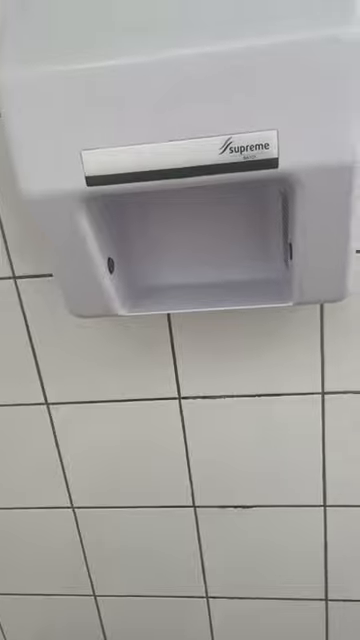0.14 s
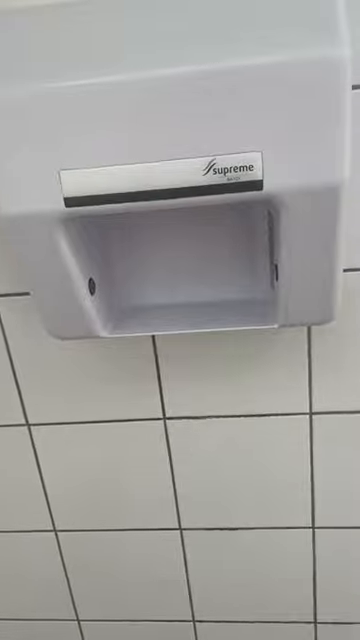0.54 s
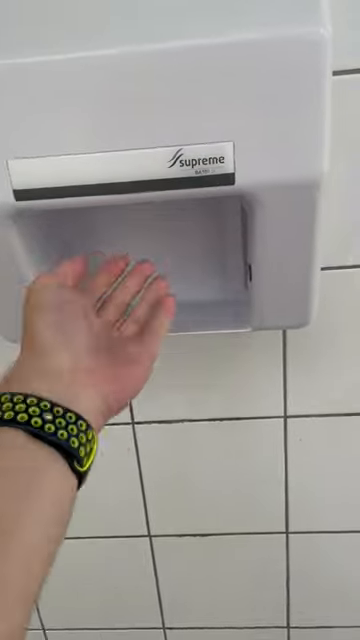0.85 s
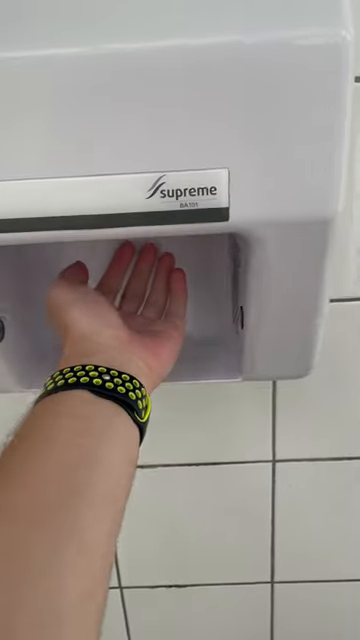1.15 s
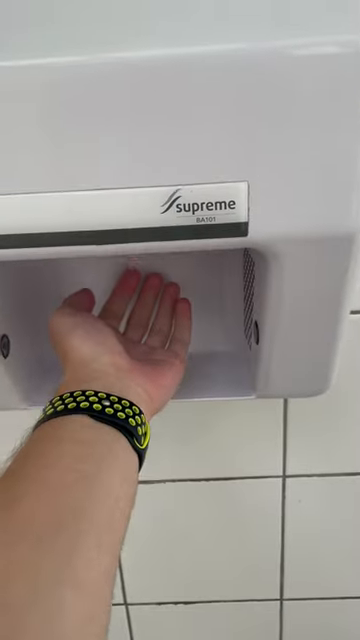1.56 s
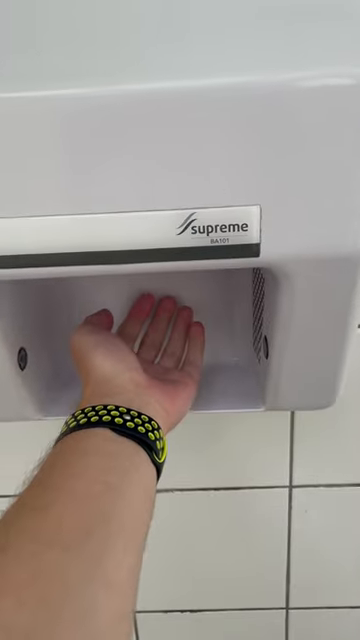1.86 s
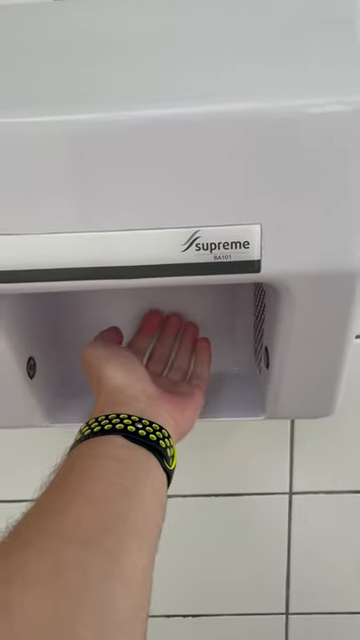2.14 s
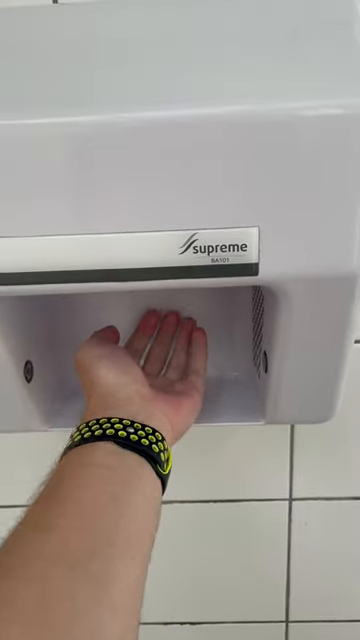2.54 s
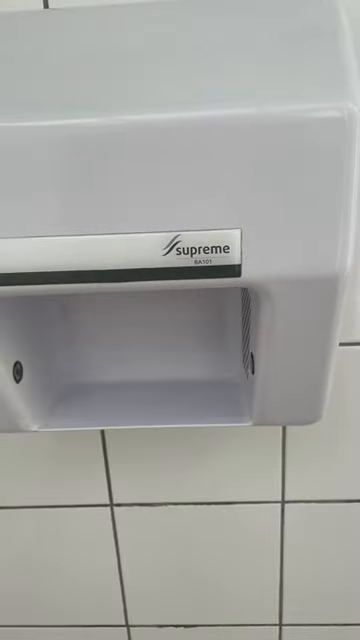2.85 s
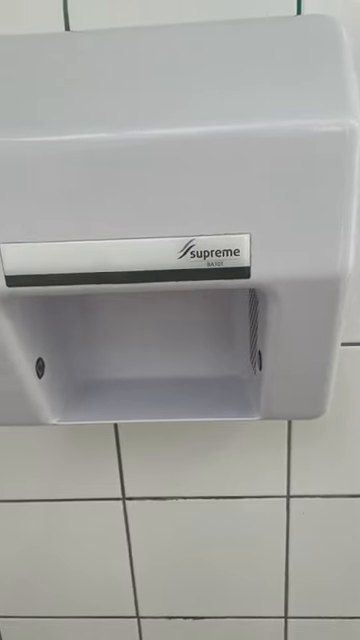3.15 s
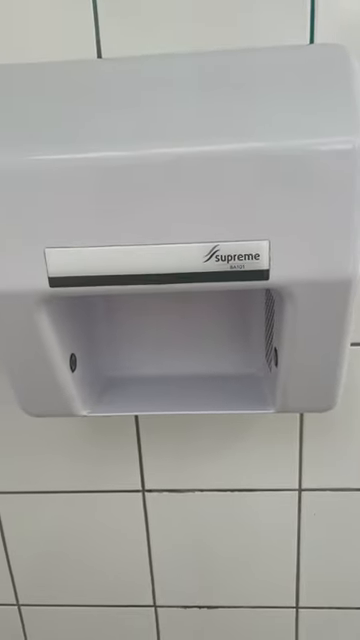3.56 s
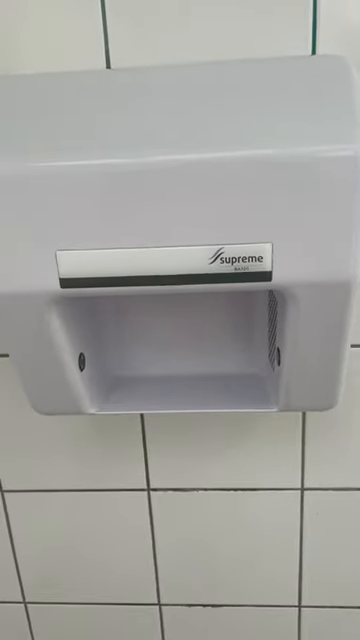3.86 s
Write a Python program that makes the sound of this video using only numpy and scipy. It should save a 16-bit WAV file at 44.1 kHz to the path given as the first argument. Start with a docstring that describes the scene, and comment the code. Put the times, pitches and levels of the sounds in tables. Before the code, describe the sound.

A hand dryer starts after a second of low ventilation rumble: a small click, a quick rising motor whir, then a loud steady air roar; stereo phone half a metre away in a tiled washroom.

```python
"""Hand dryer in a tiled washroom

Stereo phone, half a metre from a wall dryer. Under it all lie the rumble and hum of the ventilation,
made of filtered noise and sines, with faint sleeve rustles. A relay clicks as rattling noise through
short rings; the motor's harmonics climb through casing resonances; the air jet roars in bands of noise,
in the casing and round a hand, which later withdraws."""
import sys
import numpy as np
from scipy import signal
from scipy.fft import rfft, irfft
from scipy.io import wavfile
from scipy.ndimage import uniform_filter1d

SR = 44100
rng = np.random.default_rng(int(sys.argv[2]) if len(sys.argv) > 2 else 0)


def inscribe(sig):
    """Save sig as 16-bit PCM at rate SR to the path in sys.argv[1].

    A 1-D sig is mono; a 2-D sig holds one channel per row.
    Samples are clipped to [-1, 1] before scaling.
    """
    pcm = np.round(np.clip(np.atleast_2d(sig).T, -1, 1) * 32767)
    wavfile.write(sys.argv[1], SR, pcm.astype(np.int16))


N = 176400
T = np.arange(N) / SR  # time in seconds
F = np.arange(N // 2 + 1) * SR / N  # spectrum bins in Hz
START_S = 1.127  # the motor and the air start


def undb(db):
    """Amplitude factor of a level in dB."""
    return 10 ** (np.asarray(db) / 20)


def unit(x):
    """The signal scaled to an rms of 1."""
    return x / np.sqrt(np.mean(x ** 2))


def walk(rate):
    """Random wander with rms 1: levels held for 1 / rate seconds and smoothed twice."""
    hold = int(SR / rate)
    steps = np.repeat(rng.standard_normal(N // hold + 1), hold)
    smooth = uniform_filter1d(uniform_filter1d(steps, hold), hold)
    return unit(smooth[:N])


def colour(table):
    """Gain per bin from (Hz, dB) points, bent by the narrow resonances of casing and room."""
    # Each row: centre in Hz, width in Hz, lift in dB.
    resonances = [(200, 14, 4), (251, 12, 9), (291, 12, 9), (424, 12, 8), (566, 20, 5), (625, 16, 4),
                  (815, 40, 2), (1448, 30, 5), (1955, 40, 5), (2810, 60, 3), (4150, 400, 2),
                  (4900, 250, -1.5), (8230, 80, 6), (9220, 80, 4)]
    hz, db = np.array(table, float).T
    lift_db = sum(lift / (1 + (2 * (F - centre) / width) ** 2) for centre, width, lift in resonances)
    return undb(np.interp(np.log(F + 1), np.log(hz), db) + lift_db)


def pair(x, table, lean=1):
    """Left and right from three rows: a shared direct part and a diffuse part for each microphone."""
    points = np.array(table)
    share = np.clip(np.interp(F, points[:, 0], points[:, -1]), 0, 1)  # direct share of the power
    spectra = rfft(x)
    direct = np.sqrt(share) * spectra[0]
    diffuse = np.sqrt(1 - share) * spectra[1:]
    return irfft((direct + diffuse) * lean, N)


def tiles(x):
    """Reverberation as decaying noise: the sound itself, then a tail off the tiles for each microphone."""
    t60_s = .7
    n = int(t60_s * SR)
    tails = rng.standard_normal((2, n)) * undb(-60 * np.arange(n) / n)
    tails = tails / np.sqrt(np.sum(tails ** 2, axis=1, keepdims=True))
    return np.vstack([x, signal.fftconvolve(x[None], tails, axes=1)[:, :N]])


def washroom():
    """Ventilation as wandering low noise and fan tones, with short puffs of treble noise from a sleeve."""
    # Rumble colour. Each row: frequency in Hz, relative level in dB.
    floor = [(25, -5), (55, -4), (85, -2), (110, -8), (175, -19), (260, -10), (420, -18), (600, -16),
             (1000, -10), (1080, -14), (1155, -10), (1280, -21), (2400, -28), (3600, -36), (4400, -38),
             (4800, -33), (5300, -41), (6800, -43), (8500, -54), (10000, -60), (12500, -54), (15500, -70)]
    # Ventilation fan. Each row: frequency in Hz, mean level in dB.
    fan_tones = [(35, -40.5), (70, -40.5)]
    # Sleeve rustles. Each row: middle in seconds, time from the middle to 1/e in seconds, level in dB.
    rustles = [(.345, .03, -72), (.59, .025, -65), (.66, .015, -71)]
    # Likeness of left and right. Each row: frequency in Hz, share of power common to both.
    around = [(0, 1), (60, 1), (150, 0.96), (350, 0.85), (700, 0.1), (2500, 0.062), (5000, 0.16),
              (22050, 0.037)]
    floor_db = -36.5

    noise = rfft(rng.standard_normal((3, N)))
    rumble = unit(irfft(noise * colour(floor) * (F > 29), N))
    rumble = rumble * undb(floor_db + 1.0 * walk(4.97))

    hum = sum(np.sqrt(2) * undb(db + 2.2 * walk(9.98)) * np.cos(2 * np.pi * hz * T)
              for hz, db in fan_tones)

    treble = signal.butter(2, 5500, "high", fs=SR, output="sos")
    cloth = unit(signal.sosfilt(treble, rng.standard_normal((3, N))))
    rustle = cloth * sum(undb(db) * np.exp(-((T - s) / length) ** 2) for s, length, db in rustles)
    return pair(rumble + rustle, around) + hum


def relay():
    """Contacts rattle shut: a decaying noise burst excites a few short rings."""
    # Each row: frequency in Hz, relative level in dB, time to fall 60 dB in seconds.
    contact_rings = [(1510, -5, 0.022), (6380, -1.5, 0.0071), (7800, 2, .005), (10500, -7, 0.0037),
                     (13300, -6, .003)]
    click_s, peak_db = 1.1165, -28  # peak before the room
    rattle_s = .007  # decay to 1/e

    t = np.arange(4000) / SR
    ring = sum(undb(db - 60 * t / t60) * np.sin(2 * np.pi * hz * t) for hz, db, t60 in contact_rings)
    rattle = rng.standard_normal(len(t)) * np.exp(-t / rattle_s)
    hit = signal.fftconvolve(rattle, ring)[:len(t)]
    out, i = np.zeros(N), int(click_s * SR)
    out[i:i + len(t)] = undb(peak_db) * hit / np.abs(hit).max()
    return out


def motor():
    """Speed nears its top exponentially; tones, rough under strain, flare as they cross casing resonances."""
    # Each row: multiple of the lowest tone, relative level in dB at full speed, extra dB at standstill.
    harmonics = [(1, -49, 18), (2, -38.5, -16), (3, -62, -8), (4, -54, -10), (5, -64, -14), (6, -56, -22)]
    # The air load shifts the full speed a little. Each row: time in seconds, share of the nominal speed.
    load = [(1.7, 1.001), (1.9, .997), (2.5, .999), (2.65, .997), (3.2, 1.002), (3.48, .998), (3.68, 1.005),
            (3.9, .997), (4.0, .996)]
    # Course of the whine. Each row: time in seconds, gain in dB.
    whine = [(1.12, 0), (1.3, 1), (1.42, 2), (1.47, -9), (1.55, 4), (1.66, 5), (1.75, 9), (2.0, 5),
             (2.2, 3), (2.55, 6), (2.68, -2), (2.8, 1), (3.4, 2), (3.48, -1), (3.7, 5), (3.85, -1),
             (4.0, -1)]
    # Casing resonances the tones pass through. Each row: centre in Hz, width in Hz, gain in dB.
    casing = [(172, 22, 14), (385, 25, 11), (575, 25, 16), (780, 30, 13), (905, 45, 21), (1200, 120, 3),
              (1520, 50, 12), (1950, 50, 10), (2180, 80, 16), (2370, 110, 16), (2690, 250, 3),
              (3450, 120, 12), (3900, 150, 10), (4200, 150, 23), (5400, 200, 3), (5900, 130, 18),
              (7050, 110, 29)]
    runup_s, whine_hz = .126, 1349  # time constant; nominal lowest tone at full speed
    wobble, wobble_db = .002, 1  # rms wobble of the speed as a share, and of each tone's level
    flutter_db, strain_db = 2.5, 5  # rms quick flutter at full speed, and extra at standstill
    through = .08  # share of the tones that passes between the resonances

    speed = 1 - np.exp(-np.clip(T - START_S, 0, None) / runup_s)
    tone_hz = whine_hz * speed * np.interp(T, *np.array(load).T) * (1 + wobble * walk(20))
    phase = 2 * np.pi * np.cumsum(tone_hz) / SR

    tones = 0
    for multiple, db, standstill_db in harmonics:
        level_db = db + standstill_db * (1 - speed) + wobble_db * walk(6.85)
        level_db = level_db + (flutter_db + strain_db * (1 - speed)) * walk(60.18)
        tones = tones + np.sqrt(2) * undb(level_db) * np.sin(multiple * phase)
    tones = tones * undb(np.interp(T, *np.array(whine).T))

    out = through * tones
    for hz, width, db in casing:
        out = out + undb(db) * signal.lfilter(*signal.iirpeak(hz, hz / width, SR), tones)
    return out


def air():
    """Jet turbulence: noise in half-octave bands that swell together and flicker alone."""
    # Each row: time in seconds, then relative level in dB under 1 kHz, from 1 to 4 kHz, over 4 kHz.
    roar_levels = [(1.13, -35, -46, -51), (1.17, -32.5, -42, -35.5), (1.24, -25.5, -32.5, -29.5),
                   (1.34, -24.5, -26.5, -26), (1.43, -22.5, -23, -27), (1.61, -23.5, -23, -27),
                   (1.74, -22.5, -21, -26.5), (2.06, -24, -24, -28), (2.34, -25.5, -22.5, -28.5),
                   (2.77, -25, -25.5, -31.5), (3.58, -26, -27, -32), (3.7, -25, -25.5, -32),
                   (3.98, -27, -29, -33.5), (4.0, -33, -27, -34)]
    # Colour of the roar. Each row: frequency in Hz, relative level in dB per Hz.
    air_colour = [(30, -25), (60, -9), (140, -4), (218, -9), (280, -3), (520, -9), (610, -3), (700, -1),
                  (850, -2), (1000, -10), (1250, -9), (1500, -3), (1800, -14), (2300, -7), (2480, -14),
                  (2800, -8), (3500, -16), (4100, -15), (5000, -21), (6000, -15), (7200, -13), (9000, -14),
                  (10500, -18), (12500, -15), (13600, -18), (15500, -30)]
    swell_db, flicker_db = -0.47, 1.22

    rows = np.array(roar_levels)
    noise = rfft(rng.standard_normal((3, N))) * colour(air_colour)  # direct, left and right diffuse
    swell = walk(3.69)

    levels = []
    for k, (lo, hi) in enumerate(((200, 1000), (1000, 4000), (4000, 8000))):
        band_rms = np.sqrt(2 * np.sum(np.abs(noise[0, (F > lo) & (F < hi)]) ** 2)) / N
        levels.append(undb(np.interp(T, rows[:, 0], rows[:, k + 1])) / band_rms)

    out = 0
    for hz in 44 * 2 ** np.arange(0, 9, .5):
        # triangles on an octave scale, each reaching its neighbours' centres
        window = np.clip(1 - np.abs(2 * np.log2((F + 1) / hz)), 0, 1)
        band = irfft(noise * window, N)
        level = levels[int(hz > 1000) + int(hz > 4000)]
        out = out + band * level * undb(swell_db * swell + flicker_db * walk(12))
    return out * np.clip((T - START_S) / 0.0089, 0, 1)


def scene():
    """The dryer as the two microphones meet it, with level and phase leaning by frequency, over the room."""
    # Microphones facing the dryer. Each row: frequency in Hz, left minus right in dB before the turn,
    # radians by which left leads, direct share of power.
    ports = [(0, -.3, .2, .99), (200, -1.2, .2, .99), (330, -1.2, .5, .93), (480, 4, 1, .6),
             (700, 10, .3, .6), (1000, 5, .3, .7), (1450, 5, -.7, .75), (2100, 3, 0, .5),
             (2700, 1.5, -1.3, .7), (3600, 1, -.3, .7), (4700, 0, 0, .55), (5300, 0, 0, .8),
             (7500, 0, 1.6, .8), (8500, 0, 2.9, .99), (11000, 0, 3.3, .995), (12000, 0, 4.4, .7),
             (13500, 0, 5.2, .7), (14100, 0, 6.28, .995), (22050, 0, 6.28, 1)]
    turn_db_per_s = -.6  # the phone turns slowly: drift of left minus right
    echo_share = .6  # share of the diffuse roar's power that is echo off the tiles

    hz, db, lead = np.array(ports).T[:3]
    side = np.array([[1], [-1]])  # left, right
    lean = undb(side * np.interp(F, hz, db) / 2) * np.exp(.5j * side * np.interp(F, hz, lead))
    turn = undb(side * turn_db_per_s * (T - 2) / 2)

    roar = air()
    echo = np.sqrt([[0], [echo_share], [echo_share]])  # the direct row stays dry
    roar = np.sqrt(1 - echo ** 2) * roar + echo * tiles(roar[0])
    near = tiles(motor() + relay()) * undb([[1], [-3], [-3]])  # dB of direct, left tail, right tail
    return pair(roar + near, ports, lean) * turn + washroom()


def record(dry):
    """The phone slowly turns loud sound down by its smoothed power, opens from silence and cuts the top."""
    gain_s, threshold_db = 0.99, -23.5  # smoothing time constant; level where the gain starts to fall
    gain_share = 0.34  # dB turned down per dB over the threshold
    opens_s, top_hz = 0.034, 15690

    a = np.exp(-1 / (gain_s * SR))
    power = signal.lfilter([1 - a], [1, -a], np.mean(dry ** 2, axis=0))
    gain = np.maximum(power / undb(2 * threshold_db), 1) ** (-gain_share / 2)
    wet = dry * gain * np.clip((T - opens_s) / 0.0057, 0, 1)
    return signal.sosfilt(signal.ellip(14, .3, 70, top_hz, fs=SR, output="sos"), wet)


dry = scene()
out = record(dry)
inscribe(out)
```